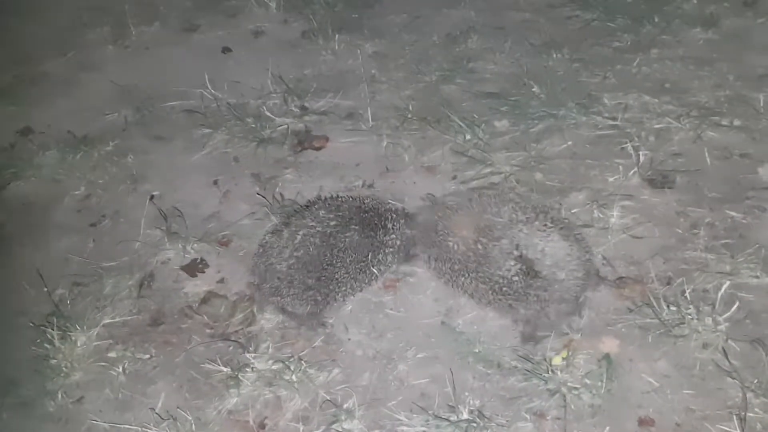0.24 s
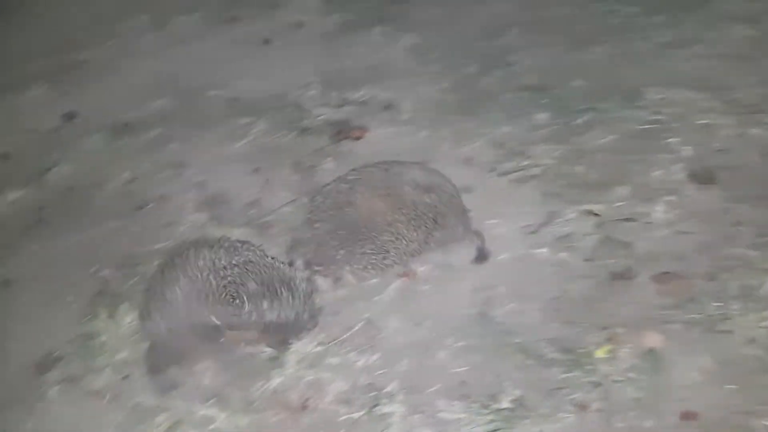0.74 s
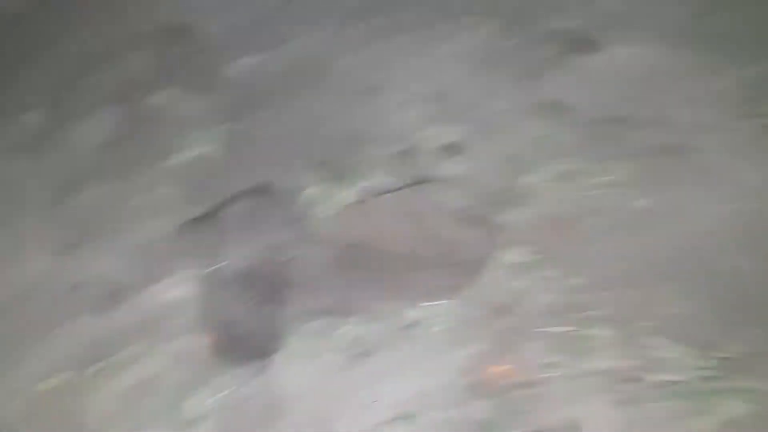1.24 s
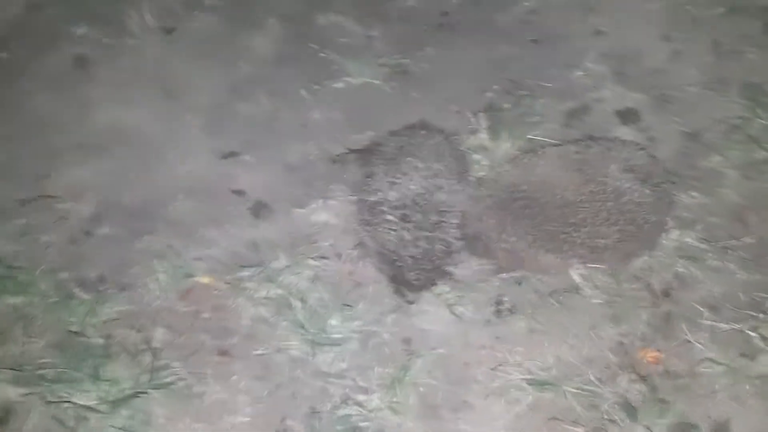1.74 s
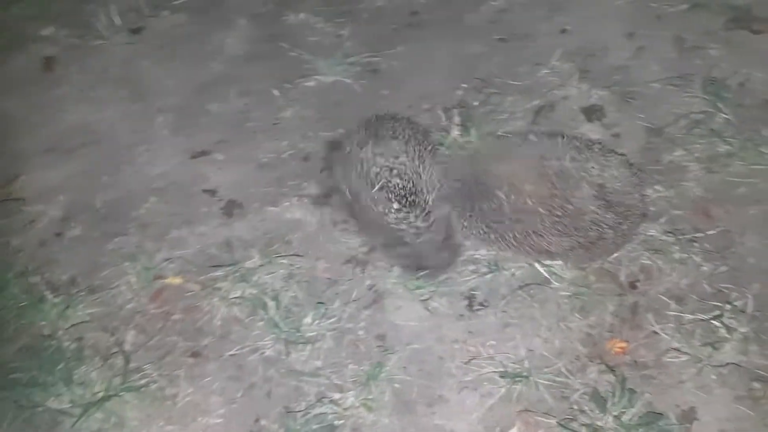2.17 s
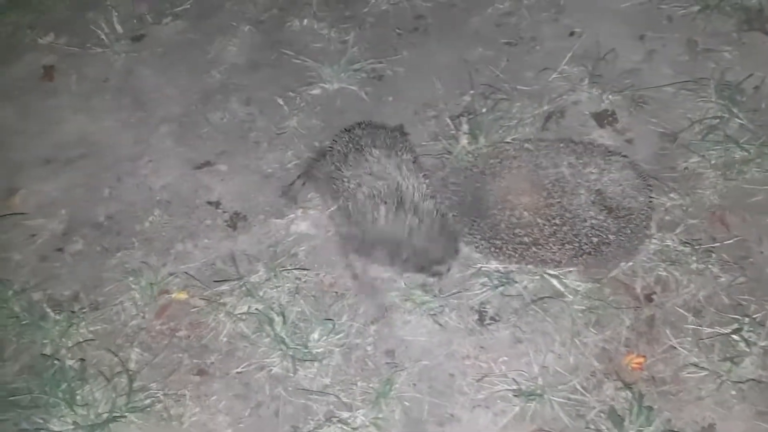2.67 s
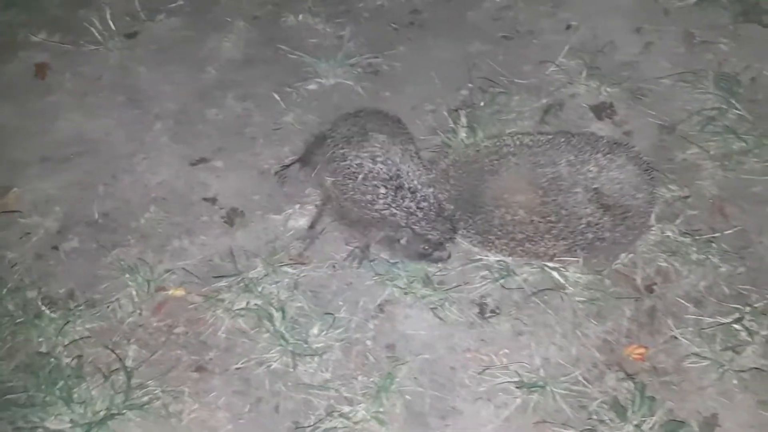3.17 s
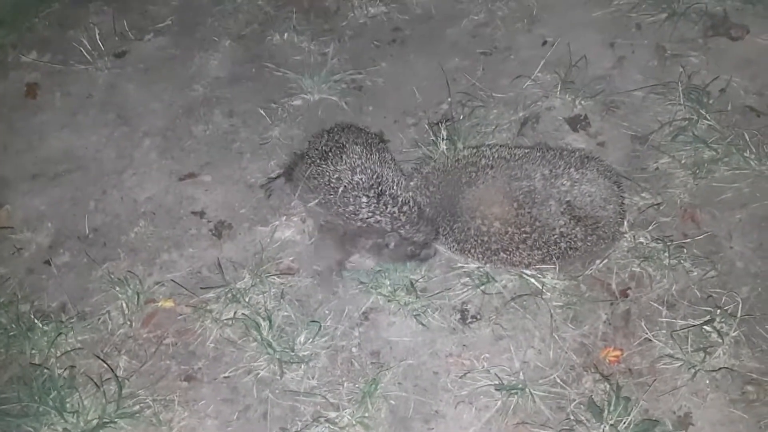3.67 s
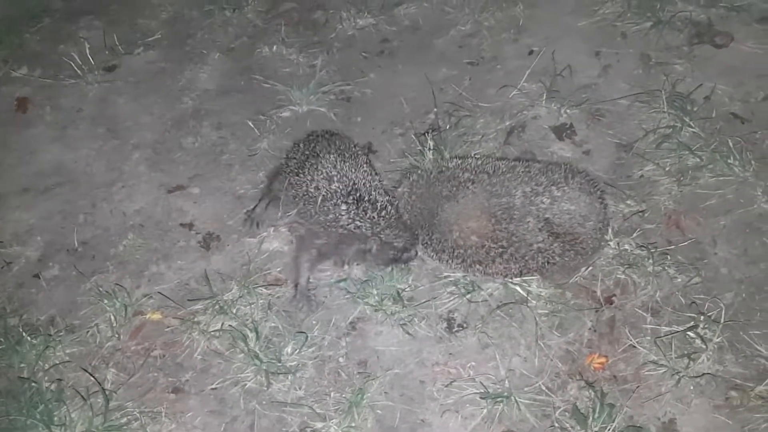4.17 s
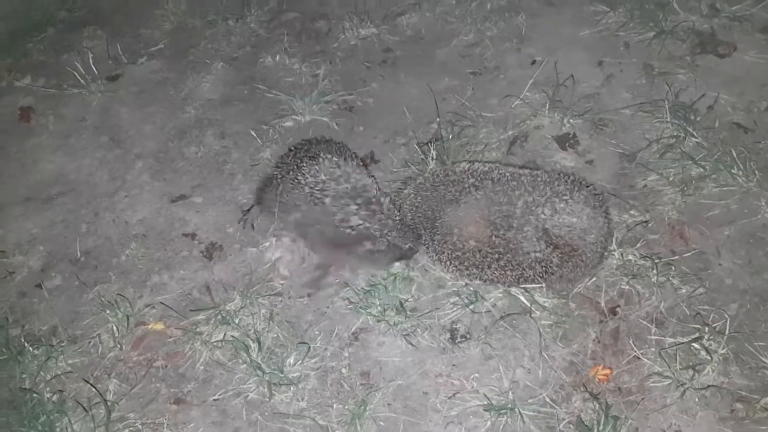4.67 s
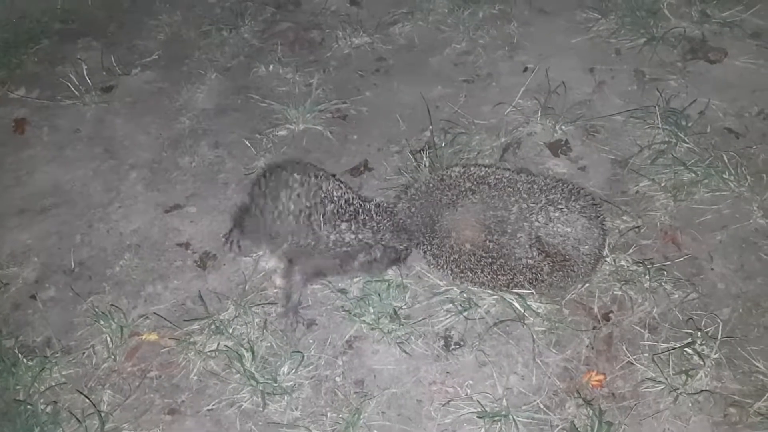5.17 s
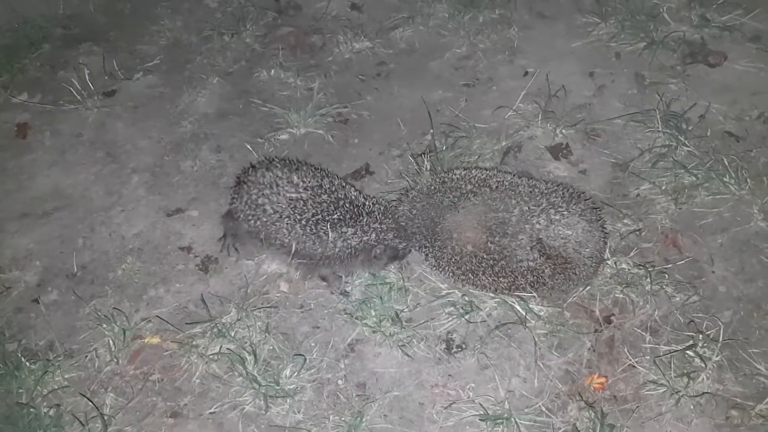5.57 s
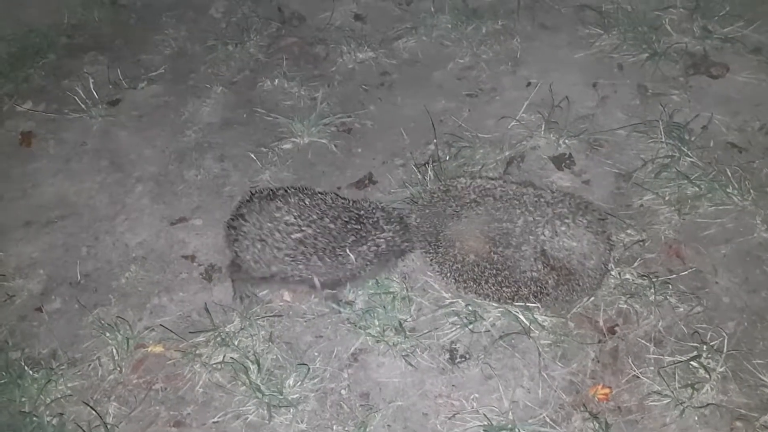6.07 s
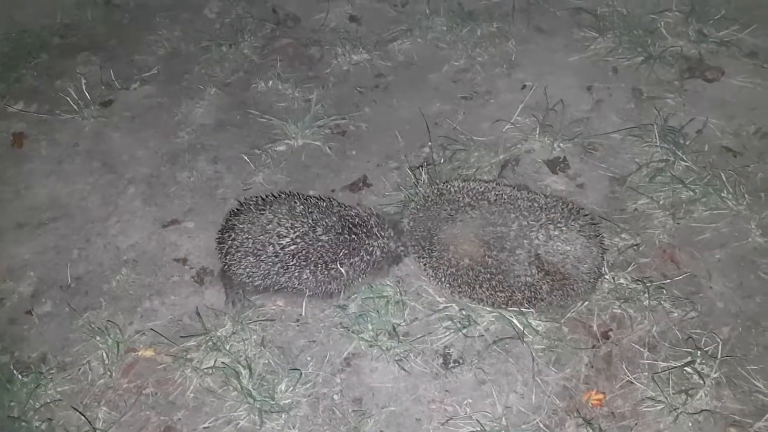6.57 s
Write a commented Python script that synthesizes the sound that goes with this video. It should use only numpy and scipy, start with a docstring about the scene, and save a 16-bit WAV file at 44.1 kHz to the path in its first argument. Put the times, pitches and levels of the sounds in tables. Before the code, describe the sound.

Two hedgehogs are heard close by on grass at night, over very faint microphone hiss and far low rumble. It opens on the end of a snort, then fluttering nasal puffs at about 0.2, 0.4 and 0.8 seconds. From 0.3 to 1.4 the animals shove: scratchy rustles, soft breaths, brief pulsed growls, and sharp grass cracks, strongest around 0.9 to 1.1. A rasping rustle swells near 1.25. Snorts resume at 1.7, 2.0 and 2.2, the last two with dull low bumps, and another short growl follows at 2.3. Two quick snorts come at 2.7 and 2.8. From about 3.1 to the end near 7 seconds, steady chuffs repeat every third of a second, each about a tenth of a second of buzzing, hollow nose tone with airy hiss and a rapid fall. Only tiny ticks and faint breaths sit between them, with a short soft outdoor echo.

```python
"""Snorts lead, about three a second for most of the scene: fluttering nostrils chop air into puffs that ring
the nose, with turbulent hiss on top. They come from two hedgehogs facing each other on a lawn at night.
Early on the animals shove: breaths, pulsed growls, dull bumps and snapping grass (noise bursts) fill the gaps.
A two-port microphone hears them close by, with a short diffuse echo over far rumble and faint hiss."""
import sys
import numpy as np
from scipy import signal
from scipy.fft import rfft, irfft, next_fast_len
from scipy.io import wavfile
from scipy.ndimage import uniform_filter1d

SR = 44100
rng = np.random.default_rng(int(sys.argv[2]) if len(sys.argv) > 2 else 0)


def unload_audio(sound):
    """Save the sound as a 16-bit wav file, at the path given as the first command line argument."""
    columns = np.transpose(np.atleast_2d(sound))
    # keep every value between -1 and 1, then stretch to whole-number steps
    steps = np.round(np.clip(columns, -1, 1) * 32767)
    wavfile.write(sys.argv[1], SR, steps.astype(np.int16))


N = 301203
FFT_SIZE = next_fast_len(N)
FREQS_HZ = np.fft.rfftfreq(FFT_SIZE, 1 / SR)
LOG_FREQS = np.log(FREQS_HZ + 1)

# Night air, density spectrum: (f/Hz, relative level/dB); overall level before the swell
NIGHT_SPECTRUM = [(29, -9), (50, 4), (245, -5), (377, -13.5), (610, -14.5), (1040, -15.5), (1200, -18.5),
                  (1600, -20), (2130, -20.5), (3360, -23.5), (5060, -28.5), (6920, -31), (8590, -33),
                  (13600, -30.5), (15700, -26)]
NIGHT_DB = -64
# Night air at the two ports: (f/Hz, likeness)
NIGHT_LIKENESS = [(60, 0.82), (150, 0.91), (380, 0.4), (950, -0.037), (2380, 0.029), (5980, -0.15),
                  (15000, 0.0048)]
# (f/Hz, left over right level/dB)
NIGHT_LEFT_DB = [(60, -0.5), (180, -1), (550, -1), (1650, -1.5), (4970, 0), (15000, 1.0)]

# Ports facing the animals: (f/Hz, likeness)
NEAR_LIKENESS = [(100, 1), (400, 0.98), (800, 0.98), (2300, 0.97), (2800, 0.45), (4300, 0.58), (5200, 0.38),
                 (8300, 0.64), (10000, 0.38), (15000, 0.67)]
# (f/Hz, left over right level/dB)
NEAR_LEFT_DB = [(100, 0.5), (400, -1.6), (1200, 2.5), (1900, 0), (2700, 1.5), (3200, 1), (5000, 11),
                (6500, 4.5), (9800, 10.5), (12000, 3), (14500, -0.5)]
# (f/Hz, phase lead of the left/rad)
NEAR_LEAD = [(100, -0.5), (350, -0.08), (1300, 0.46), (1700, 0.5), (2700, 0.7), (3000, 1), (4800, 0),
             (5300, -0.5), (9300, 0.5), (10500, -1.5), (12000, 2.5), (13500, -4.5), (15500, 5.5)]
# Soft breaths and rustles, from further left: (f/Hz, likeness)
ASIDE_LIKENESS = [(100, 1), (1500, 0.61), (3000, 1), (5000, 0.1), (15000, 0.084)]
# (f/Hz, left over right level/dB)
ASIDE_LEFT_DB = [(100, 3), (1200, -1.5), (2500, 4.5), (4000, 4.5), (5500, 5.5), (10000, 5), (15000, 0)]
# (f/Hz, phase lead of the left/rad)
ASIDE_LEAD = [(100, .05), (500, 0.3), (1000, 0.68), (2000, 1.46), (4000, 1.8), (8000, 7.2)]

# Grass snaps: (t/s, gain of the dull crack/dB, gain of the bright tick/dB)
SNAPS = [(0.376, -49, -62), (0.5194, -60, -47), (0.6, -50, -58), (0.653, -58, -52.5), (0.9247, -37, -53),
         (1.053, -49, -41), (1.0857, -35, -36), (1.544, -47, -62), (1.6044, -60, -73), (1.8335, -51, -62),
         (1.8894, -58, -64), (2.2894, -41, -54), (2.5594, -64, -58), (2.59, -68, -59), (2.987, -64, -60),
         (3.187, -64, -60), (3.21, -66, -60), (3.9554, -70, -59), (4.1524, -56, -43), (4.576, -47.5, -63),
         (4.892, -68, -60), (4.904, -70, -61), (4.988, -67, -61), (5.128, -68, -51), (5.141, -68, -61),
         (5.169, -68, -58), (5.294, -65, -65), (5.474, -72, -60), (6.1694, -68, -58), (6.2916, -67, -62),
         (6.583, -52.5, -62)]
# Low thumps as the bodies bump near the start of a snort: (t/s, level/dB)
THUMPS = [(2.002, -40.5), (2.204, -40)]
# Growls: (start t/s, length/s, level/dB, nasal ring over that level/dB)
GROWLS = [(.412, 0.083, -54, 1.5), (0.732, .03, -58, -1.5), (.89, .045, -53, -6),
          (0.958, .055, -47.5, -12.5), (1.029, .045, -51.5, -13), (1.083, .06, -52, -5),
          (2.284, 0.088, -48.5, -5.5), (2.39, 0.047, -62, -1)]
GROWL_EDGE_S, GROWL_EDGE_DB = .012, -10
THROAT_HZ, THROAT_T60_S = 318, 0.012
NASAL_HZ, NASAL_T60_S = 794, 0.011

# Soft breaths and rustles; a row that ends before it starts is silent but still guides the rasp centre:
# (start t/s, peak t/s, end t/s, rasp level/dB,
# over the rasp: low body/dB, low hiss/dB, high hiss/dB, thin top air/dB; rasp centre f/Hz)
BREATHS = [ (0.308, 0.419, 0.52, -61, 2.5, -2, -3, -1, 1850),
           (.48, 0.518, 0.76, -62.5, 15.5, -7, -3, -3.5, 1620),
           (0.599, 0.646, 0.67, -68.5, 10, 8, 11, 12.5, 1830),
           (0.674, 0.72, 2.2, -64, 11.5, -2.5, -0.5, 0.5, 1770),
           (0.877, 0.914, 0.94, -54.5, 15.5, -4, -11, -9, 1740),
           (0.949, 0.992, 1, -61.5, 17, 0.5, -2.5, 2.5, 1676),
           (1.04, 1.092, 1.1, -56.5, 13, -1, -3, 0, 1610),
           (1.085, 1.14, 1.23, -59, -2.5, -2, -1.5, -2, 1900),
           (1.186, 1.248, 1.32, -48, -17, -4, -3.5, -6.5, 2380),
           (1.26, 1.33, 1.35, -50.5, -8, -8, -9, -11.5, 2420),
           (1.398, 1.44, 1.51, -63, 2, -1.5, -12.5, -23, 2250),
           (1.466, 1.5, 1.51, -63, 0.5, -9, -6, -6, 2260),
           (1.554, 1.594, 1.61, -52, 2, -19, -33, -35, 1830),
           (1.635, 1.686, 1.73, -57.5, 1.5, -10, -32, -24, 1820),
           (1.788, 1.841, 1.907, -50, -8, -10, -14, -15, 2130),
           (1.86, 1.885, 1.91, -62, -3, -8, -15, -17, 2000),
           (1.968, 2.0, 2.23, -63, 1.5, -12, -16, -19, 1760),
           (2.108, 2.185, 2.22, -44, -15, -29, -19, -18.5, 2350),
           (2.27, 2.284, 2.35, -52, -3, -2, -7, -6, 1780),
           (2.33, 2.35, 2.55, -61.5, 16.5, -10, -0.5, -2, 1710),
           (2.362, 2.409, 2.46, -59.5, -7, -20, 3.5, -8, 1660),
           (2.441, 2.488, 2.496, -60.5, -2, -10, -2.5, -15, 1720),
           (2.981, 3.02, 3.1, -60.5, 5, -13, -18, -21, 1890),
           (3.168, 3.208, 3.235, -58, 1, -6, -10.5, -9, 1682),
           (4.13, 4.137, 4.19, -62.5, 0, -4.5, -5, -4.5, 1720),
           (4.45, 4.475, 4.5, -59, -6, -10.5, -7, -6, 1730), (4.537, 4.574, 4.6, -75, -5, 5, -1, 1, 1730),
           (5.12, 5.165, 5.21, -73, -5, 1.5, 5, 5, 1720), (5.45, 5.474, 5.28, -68, -3, 0, 4, 5, 1720),
           (5.81, 5.83, 5.5, -71, -5, -7, -5, -1.5, 1720), (6.12, 6.135, 6, -65, -3, -4, 5, -4, 1720), ]
BREATH_IN_DB, BREATH_OUT_DB = -11, -14  # relative to the peak, at the start and at the end
BREATH_FADE_S, BREATH_FADE_DB = .022, -12  # last fade after the end
BREATH_BULGE_DB = 0  # halfway up and down, over a straight ramp

# Snorts: (start t/s, rise/s, hold/s, effort level/dB as the hold begins, and as it ends,
# over the mean effort: nasal rasp/dB, low hiss/dB, high hiss/dB, thin top air/dB;
# gain over the hold: low hiss/dB, treble/dB;
# head direction: upper nose ring over the lower/dB, topmost air over the rest/dB)
SNORTS = [ (-.03, 0.031, 0.039, -45, -56, -6.5, -19, -19, -20, -13, -9, 8, 6),
          (0.197, 0.031, 0.063, -38.5, -47, -6.5, -27, -15, -13.5, -2, -2, 1.5, 9),
          (0.387, 0.0091, 0.0073, -43.5, -51.5, -10, -24, -18, -19, -2, 0, 5, .1),
          (0.763, 0.048, 0.069, -37.5, -42, -15, -23.5, -15, -19, -14, -4, -2.5, 3),
          (1.695, 0.038, 0.064, -39, -40.5, -5.5, -15, -15, -14.5, -7, -1.5, 0, -1.5),
          (2.004, 0.023, .078, -38, -39, -6.5, -18, -10.5, -13.5, -12, 2, -.7, -2.5),
          (2.196, 0.015, 0.051, -42.5, -37.5, -5, -17, -13.5, -17, 6, 4, -5, -1),
          (2.67, 0.017, 0.091, -37.5, -36.5, -12.5, -15.5, -10.5, -14.5, 0, -1, 0.5, 7),
          (2.78, 0.012, 0.043, -36, -40, -8.5, -13, -23, -20.5, 10, 9, .1, 2.5),
          (3.06, 0.018, 0.083, -40, -39, -8, -15.5, -13, -16.5, -9, 7, 0, -1),
          (3.427, 0.019, 0.088, -38.5, -39, -9, -11, -19, -16, -3, 3, -0.5, 1),
          (3.718, 0.02, 0.082, -41, -38.5, -6.5, -7, -17, -16, -3.5, 3, 1, 4),
          (4.014, 0.016, 0.084, -42, -40, -6, -9, -15.5, -19, -9, 0, -1, 5),
          (4.335, 0.017, 0.09, -40, -39, -10, -11, -14.5, -25.5, -9.5, -1, -0.9, 0),
          (4.682, 0.019, 0.1, -40, -41, -7.5, -12.5, -10, -20, 0, 0, -1, -3),
          (5.008, 0.017, 0.084, -40, -48.5, -4.5, -10.5, -9, -23, -5, -4.5, .1, -1),
          (5.334, 0.011, 0.098, -41.5, -42, -8.5, -13.5, -16.5, -20, -1, -3, 1.6, -3),
          (5.696, .025, 0.086, -40.5, -42.5, -7.5, -12, -13.5, -19, 3, -10, 1, -7),
          (6.004, 0.013, 0.091, -44.5, -38, -9, -11, -22, -21, 2.5, -8, .5, -5),
          (6.311, 0.017, 0.092, -43, -43, -6.5, -9, -12, -20, 1.5, -2.5, 0, -5),
          (6.619, 0.023, 0.089, -41, -51, -6, -10, -15, -23, -9.5, -8.5, 3.5, 1), ]
# Shape shared by all snorts, one row a layer (nose, rasp, low hiss, high hiss, top air):
# (start under the hold/dB, swell in mid-hold/dB, share of the effort's change, of the low hiss gain,
# of the treble gain, fall after the hold/(dB/s))
SNORT_LAYERS = [(11.5, 1.5, 0.8, 0.041, 0, 812), (12, 1, 0.27, 0, 0.036, 643),
                (11.5, 2.5, 0.24, 0.89, -0.19, 750), (18, 3.5, 0.22, 0.092, 0.89, 705),
                (14.5, 4, 0.36, 0.35, 0.45, 600)]
SNORT_FALL_S = 0.094
SHUT_DB = -6  # extra drop halfway through the fall, as the nostrils shut
FLUTTER_HZ = 321.6  # rate before its random unsteadiness

# Density spectra: (f/Hz, relative level/dB). Nose cavity
NOSE_SPECTRUM = [(59, -64), (100, -28.5), (204, -9.5), (318, -0.5), (376, -3.5), (505, -13), (710, -7),
                 (861, -3), (1070, -5), (1280, -16.5), (1500, -33), (1950, -15), (3300, -120)]
# Low body of a breath: (f/Hz, relative level/dB)
BODY_SPECTRUM = [(88, -4), (150, -0.5), (177, 5.5), (335, -1.5), (465, -1.5), (1400, -6.5), (1820, -13),
                 (3080, -120)]
# Nasal rasp: (f/Hz, relative level/dB)
RASP_SPECTRUM = [(740, -11), (1250, -10), (1340, -5.5), (1800, 0), (1960, -10), (2210, -0.5), (2750, -17),
                 (3000, -13.5), (3900, -13), (6600, -120)]
# Low hiss of a snort: (f/Hz, relative level/dB)
LOW_HISS_SPECTRUM = [(1760, -84), (3000, -15), (3700, -3), (3960, 1.5), (4450, 4.5), (5700, -8.5),
                     (7410, -17), (12500, -120)]
# High hiss: (f/Hz, relative level/dB)
HIGH_HISS_SPECTRUM = [(3240, -41), (5500, -0.5), (5900, 1), (7020, 0.5), (8180, 4), (8640, 1),
                      (9270, -14.5), (9800, -26), (12700, -45), (21600, -120)]
# Low hiss of a breath or rustle: (f/Hz, relative level/dB)
RUSTLE_SPECTRUM = [(1820, -6), (3100, -5.5), (4310, -0.5), (4670, -1), (5700, -12.5), (7410, -33),
                   (12500, -120)]
# Thin top air: (f/Hz, relative level/dB)
AIR_SPECTRUM = [(5650, -21), (9600, -4), (10100, -6.5), (11000, -0.5), (12900, -3.5), (13900, 0),
                (15700, -3)]
BAND_EDGE_HZ = 15780


def gain_of(db):
    """Level definition: amplitude is 10 to the power of level/20."""
    return 10 ** (np.asarray(db) / 20)


def unit_rms(x):
    """Power normalisation: the mean of the channels is scaled to rms 1."""
    return x / np.sqrt(np.mean(np.atleast_2d(x).mean(0) ** 2) + 1e-20)


def on_frequency_grid(points):
    """Interpolation of a spectrum along a logarithmic frequency axis."""
    f, value = np.transpose(points)
    return np.interp(LOG_FREQS, np.log(f + 1), value)


def drift(seconds):
    """Low-pass random process: noise averaged twice over the given time, rms 1."""
    size = max(round(seconds * SR), 1)
    once = uniform_filter1d(rng.standard_normal(N), size)
    return unit_rms(uniform_filter1d(once, size))


def ports(x, other, colour_db, likeness, left_db, lead=0):
    """Partial coherence: the right port hears part of the sound replaced by an unrelated twin."""
    left, twin = rfft(x, FFT_SIZE), rfft(other, FFT_SIZE)
    shared = np.clip(on_frequency_grid(likeness), -1, 1)
    right = (shared * left + np.sqrt(1 - shared ** 2) * twin) * np.exp(-1j * lead)
    tilt = gain_of(on_frequency_grid(left_db) / 2)
    both = np.array([left * tilt, right / tilt]) * gain_of(colour_db)
    return irfft(both, FFT_SIZE)[:, :N]


def near(x, other, colour_db):
    """Interaural-style level and phase differences for a sound from where the animals stand."""
    return ports(x, other, colour_db, NEAR_LIKENESS, NEAR_LEFT_DB, on_frequency_grid(NEAR_LEAD))


def aside(x, other, colour_db):
    """Interaural-style level and phase differences for a sound from further left."""
    return ports(x, other, colour_db, ASIDE_LIKENESS, ASIDE_LEFT_DB, on_frequency_grid(ASIDE_LEAD))


def airflow(spectrum, gusts, place=near):
    """Turbulence noise: random pressure, modulated by gusts and coloured by a spectrum, rms 1."""
    noise = rng.standard_normal((2, N)) * gusts
    return unit_rms(place(*noise, on_frequency_grid(spectrum)))


def played(times, levels_db):
    """Amplitude envelope: each event runs linearly in dB between its corners, silent outside events."""
    envelope = np.zeros(N)
    for at, db in zip(np.transpose(times), np.transpose(levels_db)):
        t = np.arange(max(round(at[0] * SR), 0), min(round(at[-1] * SR), N))
        envelope[t] += gain_of(np.interp(t / SR, at, db))
    return uniform_filter1d(envelope, size=130)  # about 3 ms


def rung(kicks, hz, t60, soft):
    """Damped oscillator: each kick starts softly, sucks in first, then rings briefly."""
    t = np.arange(4000) / SR
    decay, onset = gain_of(-60 * t / t60), 1 - np.exp(-t / soft)
    ring = -decay * np.sin(2 * np.pi * hz * t) * onset
    return near(signal.oaconvolve(kicks, ring / abs(ring).max())[:N], np.zeros(N), 0)


def night(swell_db=2.0):
    """Stationary noise of low coherence over much of the band: far rumble and microphone hiss, swelling slightly."""
    air = ports(*rng.standard_normal((2, N)), on_frequency_grid(NIGHT_SPECTRUM), NIGHT_LIKENESS, NIGHT_LEFT_DB)
    return gain_of(NIGHT_DB + swell_db * drift(0.11)) * unit_rms(air)


def garden(x, wet_db=-18.5, t60=0.25):
    """Diffuse reflection from ground and bushes: convolution with decaying noise, other for each port."""
    t = np.arange(12000) / SR
    tail = rng.standard_normal((2, 12000)) * gain_of(-60 * t / t60)
    return gain_of(wet_db) * signal.oaconvolve(x, tail / np.linalg.norm(tail[0]), axes=1)[:, :N]


def grass(t60=0.0083, low_hz=1300, split_hz=7000):
    """Impulsive fracture: a snap is a tiny decaying noise burst, a dull crack and a bright tick."""
    out = np.zeros((2, N))
    fall = gain_of(-60 * np.arange(800) / SR / t60)
    bursts = rng.standard_normal((len(SNAPS), 2, 800)) * fall
    dull_band = signal.butter(N=2, Wn=[low_hz, split_hz], btype="band", fs=SR, output="sos")
    bright_band = signal.butter(N=3, Wn=split_hz, btype="high", fs=SR, output="sos")
    cracks, ticks = signal.sosfilt(dull_band, bursts), signal.sosfilt(bright_band, bursts)
    for (s, dull_db, bright_db), crack, tick in zip(SNAPS, cracks, ticks):
        out[:, round(s * SR):][:, :800] += gain_of(dull_db) * crack + gain_of(bright_db) * tick
    return near(*out, 0)


def bumps(hz=175, t60=0.028, soft=0.0019):
    """Impact response: bodies answer a bump with a dull, heavily damped thud."""
    kicks = np.zeros(N)
    for s, db in THUMPS:
        kicks[round(s * SR)] = gain_of(db)
    return rung(kicks, hz, t60, soft)


def growled(nasal):
    """Envelope of the throat or of the nasal resonance: quick edges, level hold."""
    start, length, db, nasal_db = np.transpose(GROWLS)
    db, end = db + nasal * nasal_db, start + length
    times = [start - GROWL_EDGE_S, start, end, end + GROWL_EDGE_S]
    return played(times, [db + GROWL_EDGE_DB, db, db, db + GROWL_EDGE_DB])


def growl(per_s=88.0, jitter=.25, soft=.0015):
    """Source and filter: slow uneven pulses excite short throat and nasal resonances."""
    turns = np.cumsum(per_s * np.exp(jitter * drift(.008))) / SR
    pulses = np.diff(np.floor(turns), prepend=0)  # one at each whole turn
    kicks = pulses * gain_of(2.2 * drift(0.006))
    throat = unit_rms(rung(kicks, THROAT_HZ, THROAT_T60_S, soft))
    nose = unit_rms(rung(kicks, NASAL_HZ, NASAL_T60_S, soft / 2))
    return throat * growled(nasal=False) + nose * growled(nasal=True)


def resonate(x, hz, width_hz):
    """Heterodyne resonator: shifts the moving centre down to zero, smooths twice, shifts back."""
    turn = np.exp(2j * np.pi * np.cumsum(hz) / SR)
    r = np.exp(-np.pi * width_hz / SR)
    return (turn * signal.lfilter([1], np.poly([r, r]), x / turn)).real


def crackle(per_s=65.0, strength=0.75, spread_db=2.5, dies_s=0.0012):
    """Random impulse process: dry stalks and spines tick as brief jumps of a rustle's level."""
    sizes_db = spread_db * np.minimum(rng.exponential(size=N), 2.5)
    ticks = (rng.random(N) < per_s / SR) * gain_of(sizes_db)
    return 1 + strength * signal.lfilter([1], [1, -np.exp(-1 / (dies_s * SR))], ticks)


def breathed(layer):
    """Envelope of one breath layer: a swell to the peak and down, then a last fade."""
    start, peak, end, rasp_db, *over_db = np.transpose(BREATHS)
    db = rasp_db + (over_db[layer - 1] if layer else 0)
    times = [start, (start + peak) / 2, peak, (peak + end) / 2, end, end + BREATH_FADE_S]
    shape_db = [BREATH_IN_DB, BREATH_IN_DB / 2 + BREATH_BULGE_DB, 0, BREATH_OUT_DB / 2 + BREATH_BULGE_DB,
                BREATH_OUT_DB, BREATH_OUT_DB + BREATH_FADE_DB]
    return played(times, db + np.array(shape_db)[:, None])


def breaths(patchy_db=1.5, narrow_hz=700, wide_hz=2000, shut_hz=1750, open_hz=2250):
    """Turbulence without flutter: an opening nostril raises and broadens the rasp resonance."""
    gusts = gain_of(patchy_db * drift(0.0084))
    peak_s, peak_hz = np.transpose(BREATHS)[[1, -1]]
    centre = np.interp(np.arange(N) / SR, peak_s, peak_hz)
    air = aside(*rng.standard_normal((2, N)) * gusts, 0)
    opening = np.clip((centre - shut_hz) / (open_hz - shut_hz), 0, 1)
    narrow, wide = unit_rms(resonate(air, centre, narrow_hz)), unit_rms(resonate(air, centre, wide_hz))
    rasp = (1 - opening) * narrow + opening * wide
    body = airflow(BODY_SPECTRUM, gusts) * np.where(growled(nasal=False) > 0, .3, 1)  # yields to a growl
    gritty = gusts * crackle()
    upper = [airflow(shape, gritty, aside) for shape in (RUSTLE_SPECTRUM, HIGH_HISS_SPECTRUM, AIR_SPECTRUM)]
    return sum(layer * breathed(k) for k, layer in enumerate([rasp, body, *upper]))


def flutter(uneven=0.91, sharp=5.86):
    """Self-excited flaps: nostrils slap open at an unsteady rate, in narrow puffs that now and then falter."""
    unsteady = .15 * drift(.004) + .06 * drift(.03)
    turns = np.cumsum(FLUTTER_HZ * (1 + unsteady)) / SR
    opening = np.exp(sharp * (np.cos(2 * np.pi * turns) - 1))
    return opening * (1 + np.tanh(uneven * drift(0.0031) + 0.66))  # a flap cannot open wider than the nostril


def faced(x, split_hz, column):
    """Directivity: each snort tilts the part above the split against the part below, at equal mean power."""
    upper = irfft(rfft(x, FFT_SIZE) * (FREQS_HZ > split_hz), FFT_SIZE)[:, :N]
    starts = [row[0] for row in SNORTS]
    current = np.searchsorted(starts, np.arange(N) / SR, "right") - 1
    tilt = gain_of(np.array(SNORTS)[current, column])
    share = np.mean(upper.mean(0) ** 2)
    return (x - upper + tilt * upper) / np.sqrt(1 - share + share * tilt ** 2)


def blown(layer):
    """Envelope of one snort layer: rise, arched and leaning hold, two-slope fall."""
    start, rise, hold, early_db, late_db, *over_db = np.transpose(SNORTS)
    under_db, swell_db, with_effort, with_hiss, with_treble, fall_db_per_s = SNORT_LAYERS[layer]
    mid_db = (early_db + late_db) / 2 + (over_db[layer - 1] if layer else 0)
    lean_db = (with_effort * (late_db - early_db) + with_hiss * over_db[4] + with_treble * over_db[5]) / 2
    half_fall = SNORT_FALL_S / 2 + 0 * start
    times = np.cumsum([start, rise, hold / 2, hold / 2, half_fall, half_fall], axis=0)
    first, last, fall_db = mid_db - lean_db, mid_db + lean_db, fall_db_per_s * SNORT_FALL_S
    shutting = last - fall_db / 2 + SHUT_DB
    return played(times, [first - under_db, first, mid_db + swell_db, last, shutting, last - fall_db])


def head_turns(x, depth_db=2.5, from_hz=2500):
    """Varying directivity: as the head moves, random patches of the treble swell and fade."""
    hz, t, z = signal.stft(x, SR, nperseg=512)
    patches = rng.standard_normal((len(t), len(hz))).T
    for axis in (0, 0, 1, 1):
        patches = uniform_filter1d(patches, size=7, axis=axis)
    patches *= depth_db / patches.std() * (hz > from_hz)[:, None]
    return signal.istft(z * gain_of(patches), SR, nperseg=512)[1][:, :N]


def snorts(rough=.36, gating=0.31):
    """Source and filter: flap puffs and turbulence ring the nose; the flaps also modulate rasp and hiss."""
    flaps = flutter()
    puffs = signal.lfilter([1, -.945], 1, flaps)  # near-derivative of the flow
    slaps = unit_rms(near(puffs, 0 * puffs, on_frequency_grid(NOSE_SPECTRUM)))
    gusts = 1 + gating * unit_rms(flaps)
    share = np.clip(rough, 0, 1)  # power share of turbulence in the nose
    nose = unit_rms(np.sqrt(1 - share) * slaps + np.sqrt(share) * airflow(NOSE_SPECTRUM, 1))
    top = faced(airflow(AIR_SPECTRUM, 1), 11900, column=-1)
    hisses = [airflow(shape, gusts) for shape in (RASP_SPECTRUM, LOW_HISS_SPECTRUM, HIGH_HISS_SPECTRUM)]
    layers = [faced(nose, 527, column=-2), *hisses, top]
    return sum(layer * blown(k) for k, layer in enumerate(layers))


def scene():
    """Superposition: animals and grass, their echo and the night air."""
    close = head_turns(snorts() + breaths()) + growl() + bumps() + grass()
    return close + garden(close) + night()


def record(dry, low_hz=48):
    """Band limitation: the microphone loses the deepest bass, and a low-pass ends the treble."""
    thin = signal.sosfilt(signal.butter(N=3, Wn=low_hz, btype="high", fs=SR, output="sos"), dry)
    low_pass = signal.firwin(511, BAND_EDGE_HZ, window=("kaiser", 9), fs=SR)
    return signal.oaconvolve(thin, low_pass[None], "same")


dry = scene()
out = record(dry)
unload_audio(out)
```